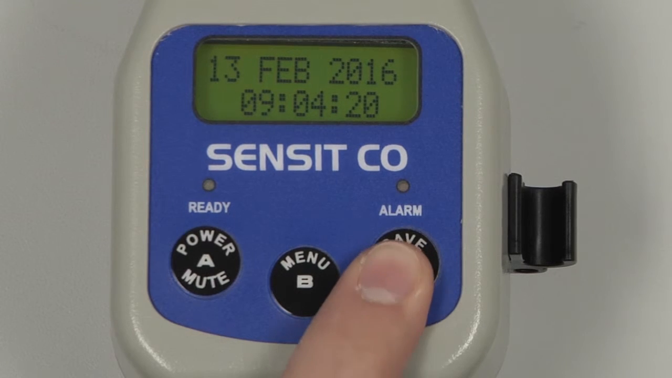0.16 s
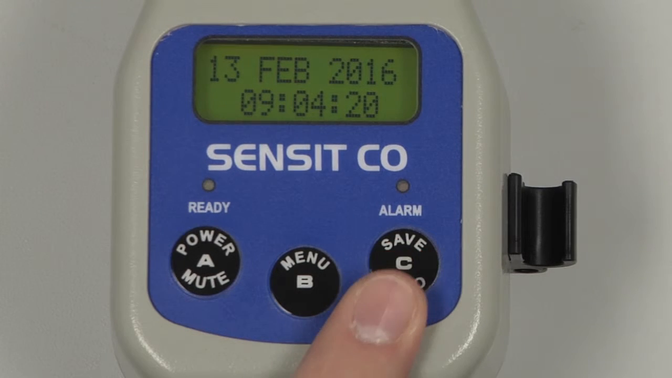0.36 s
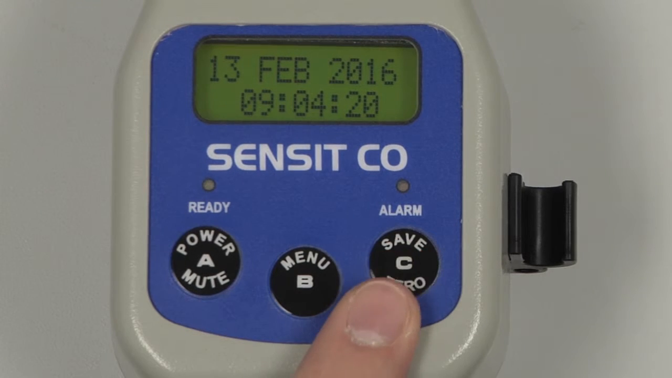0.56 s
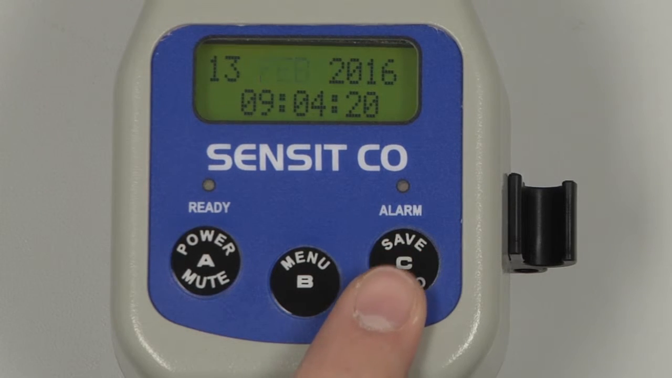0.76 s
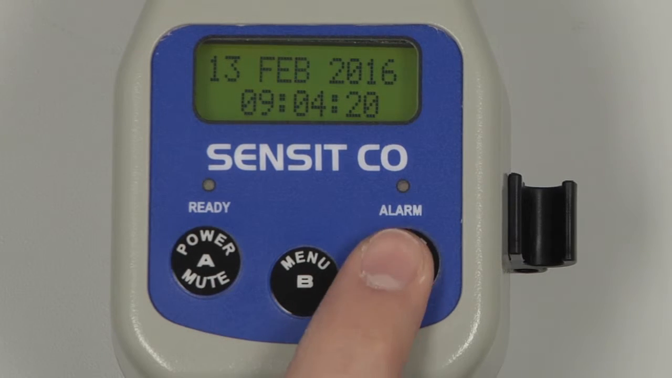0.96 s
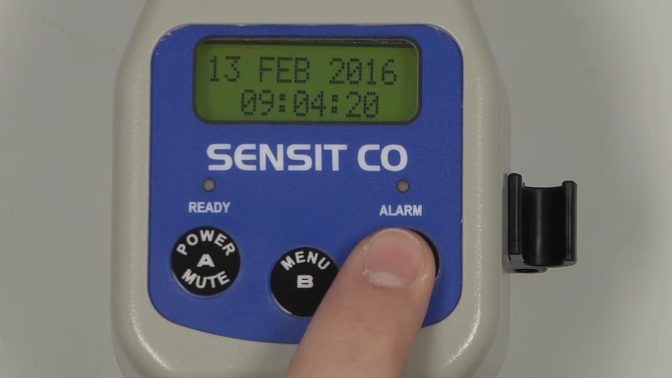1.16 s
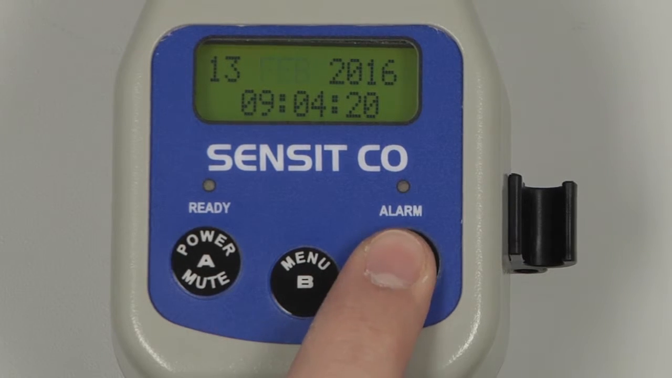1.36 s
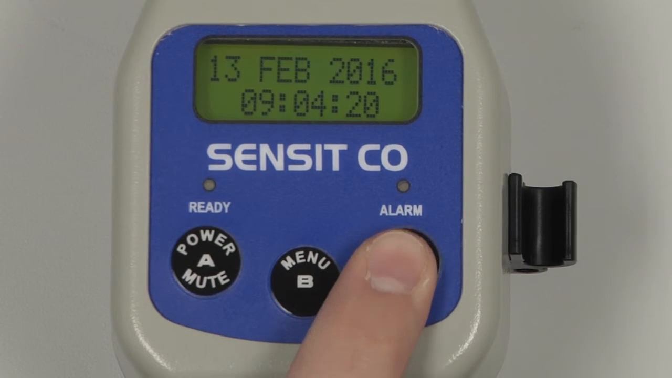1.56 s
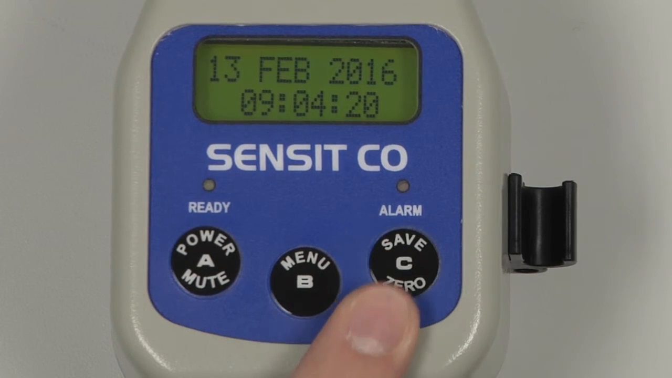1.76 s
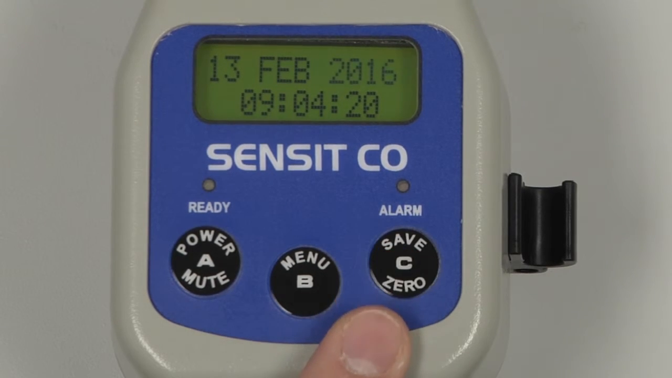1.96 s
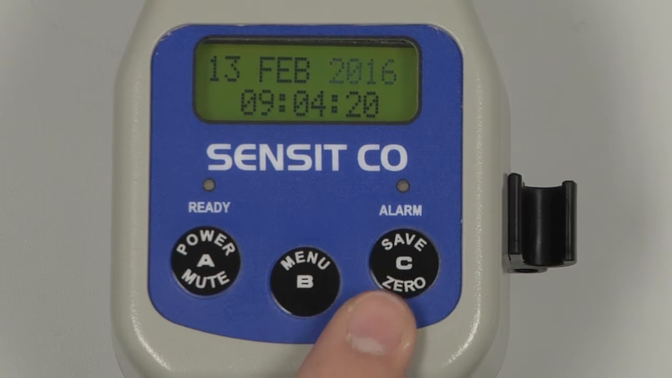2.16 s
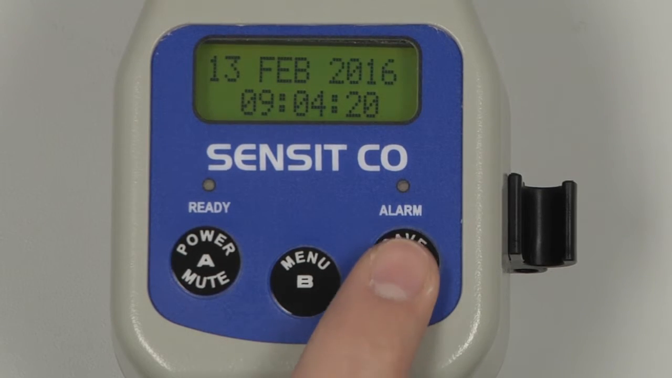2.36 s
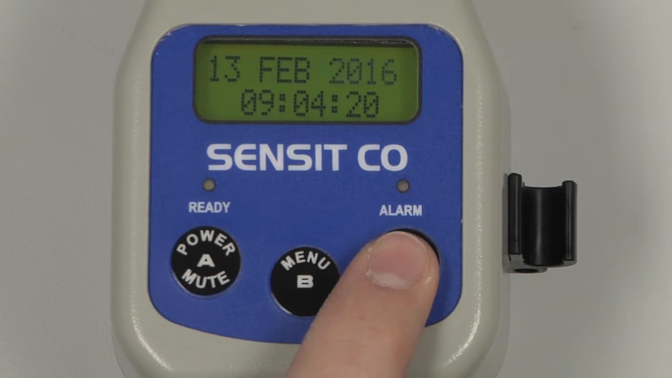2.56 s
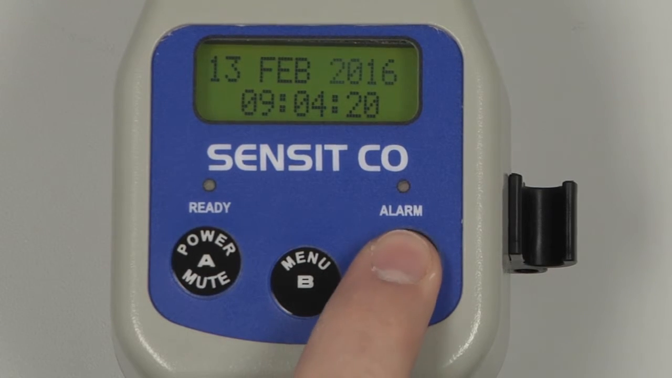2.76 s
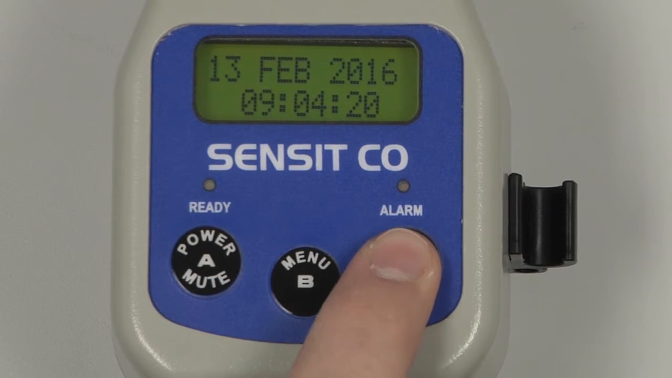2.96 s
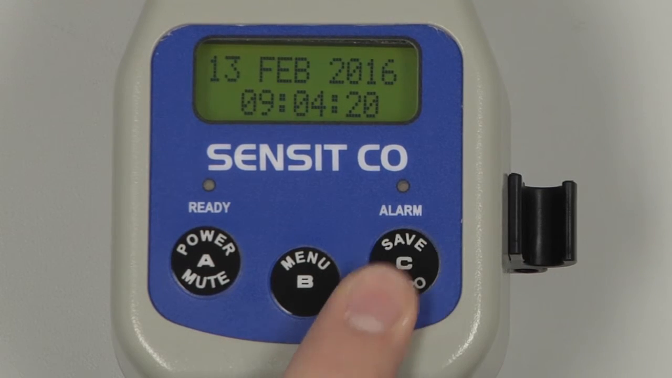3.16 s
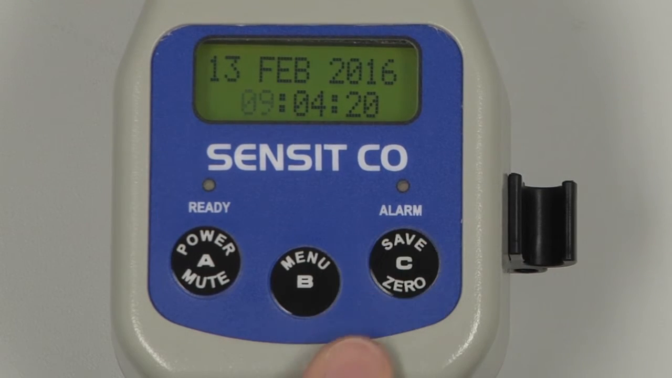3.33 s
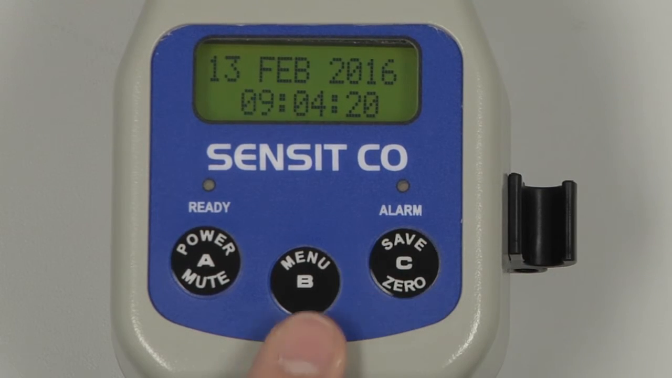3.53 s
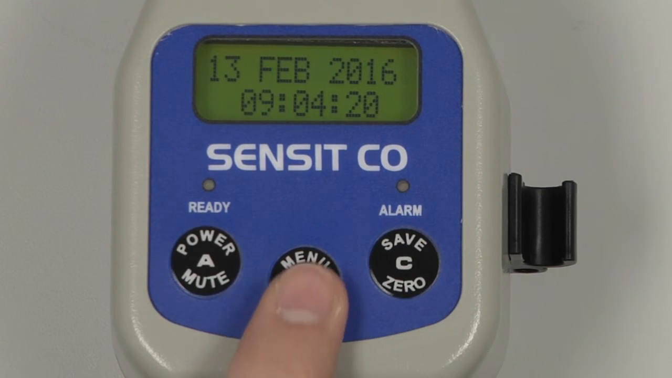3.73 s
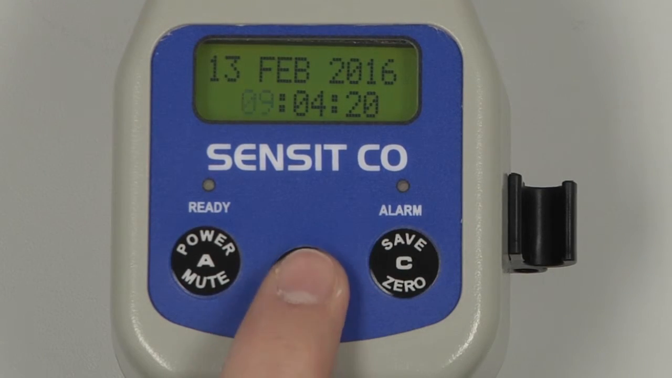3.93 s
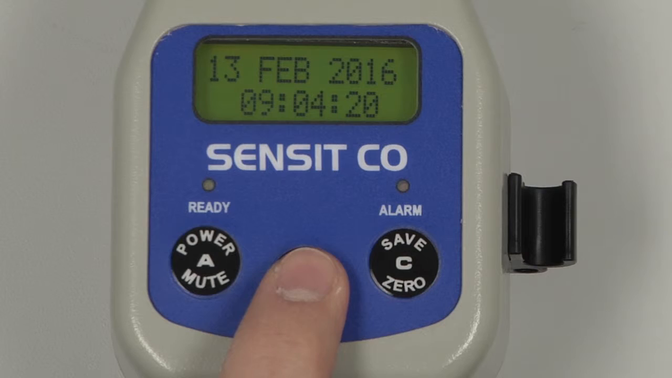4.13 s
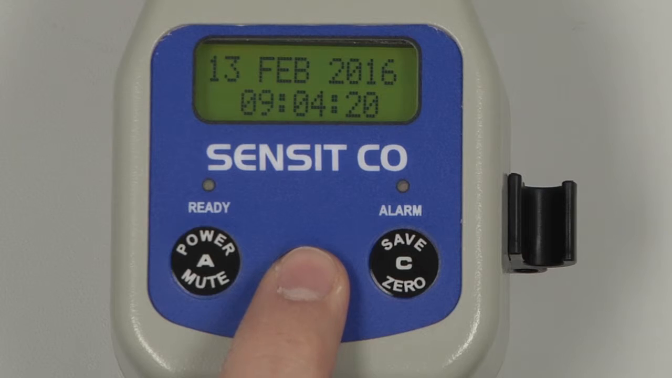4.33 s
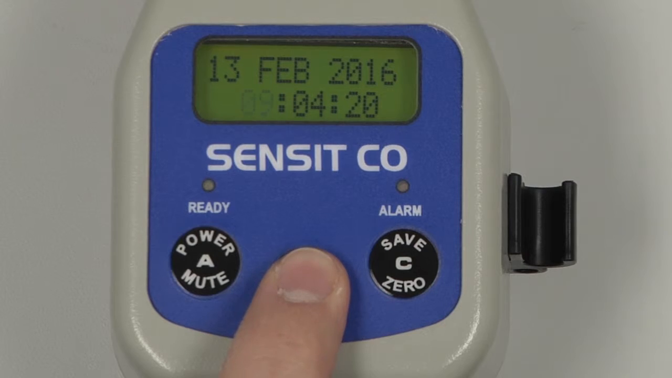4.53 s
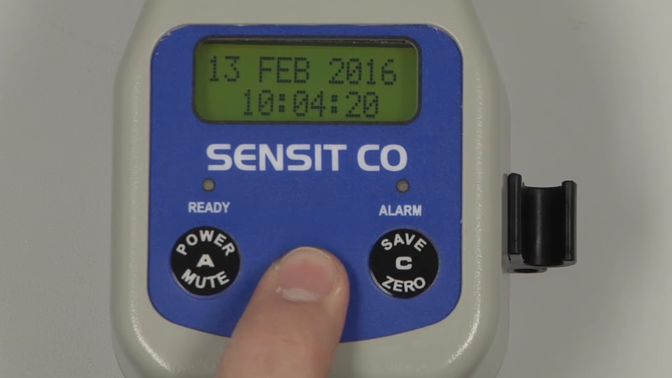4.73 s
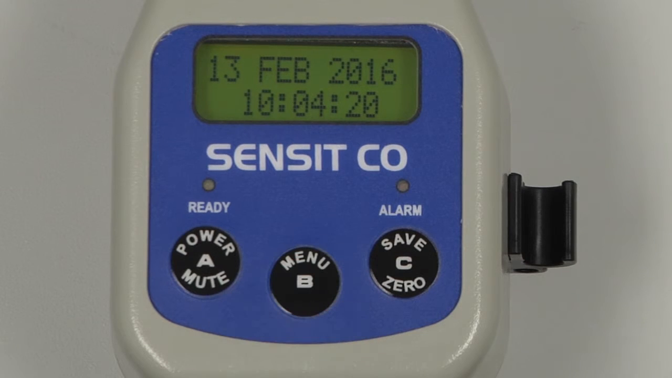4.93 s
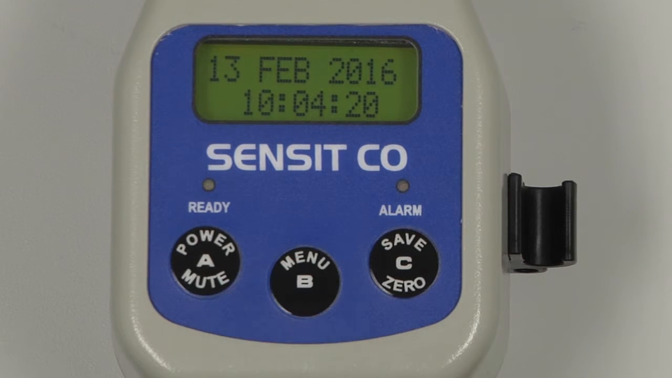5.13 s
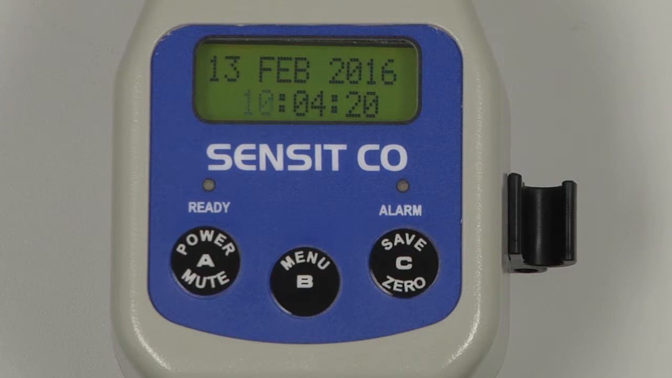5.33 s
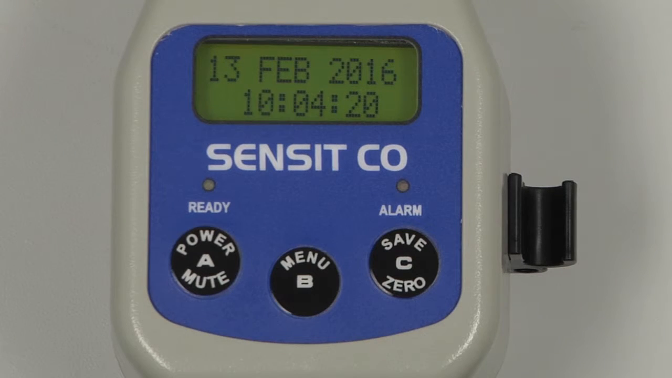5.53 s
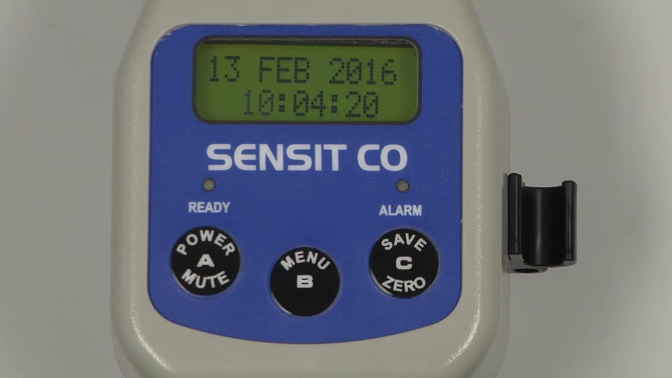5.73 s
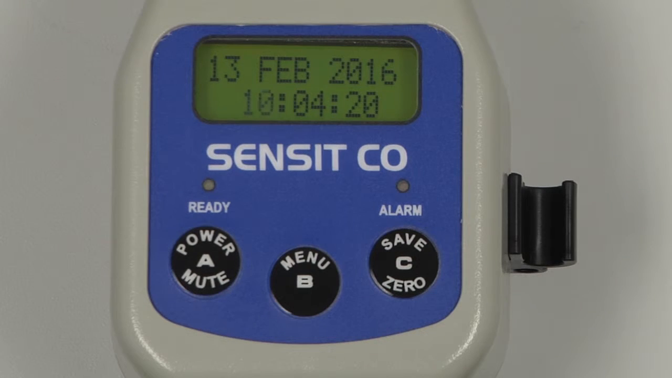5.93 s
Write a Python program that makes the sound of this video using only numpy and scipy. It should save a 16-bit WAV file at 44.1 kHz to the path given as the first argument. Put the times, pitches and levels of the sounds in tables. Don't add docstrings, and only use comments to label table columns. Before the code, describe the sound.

Close up in a quiet indoor room, a continuous harmonic motor buzz and electrical hum sit under four spaced button clicks. The first comes immediately, the others roughly a second and a half apart. Each dome snaps sharply, echoes briefly off the desk and room, then releases with a muted plastic knock. Near the end only the buzz remains, with a small creak, soft cloth rustle and a tiny hard tap.

```python
import sys
import numpy as np
from scipy import signal
from scipy.fft import rfft, irfft
from scipy.io import wavfile

SR = 44100
rng = np.random.default_rng(int(sys.argv[2]) if len(sys.argv) > 2 else 0)


def store_wav(level_fs):
    pcm = np.round(np.clip(np.atleast_2d(level_fs), -1, 1) * 32767)
    wavfile.write(sys.argv[1], SR, pcm.T.astype(np.int16))


def volts_from_decibels(level):
    exponent = np.asarray(level, float) / 20
    return 10 ** exponent


N = 268613

# (multiple of the turn rate, level [dB])
MOTOR_PARTIALS = [(1, -5), (2, -2.5), (3, -16), (4, -16.5), (5, -0.5), (6, -14), (7, -5), (8, -14),
                  (9, -12), (10, -13.5), (11, -18), (12, -0.5), (13, -13), (14, -9), (15, -17.5),
                  (16, -16.5), (17, -54), (18, -25.5), (19, -27.5), (20, -33.5), (21, -31), (22, -62),
                  (23, -21.5), (24, -26), (25, -21), (26, -26), (27, -22.5), (28, -26), (29, -25),
                  (30, -50)]
# (frequency [Hz], level [dB])
SIDE_TONES = [(430, -81), (750, -80), (860, -74), (970, -78), (1075, -84), (1500, -82), (1750, -92),
              (3200, -93)]
# (frequency [Hz], level [dB])
HOUSING_BUZZ = [(3200, -92.5), (3600, -91.5), (4200, -94.5), (4900, -92.5), (5500, -87.5), (6400, -87),
                (7200, -95), (9000, -99.5)]
# (multiple of the hum frequency, level [dB])
MAINS_PARTIALS = [(1, -61.5), (2, -90), (3, -79), (4, -71.5), (5, -81)]
# (frequency [Hz], density [dB per Hz])
RUMBLE_SPECTRUM = [(5, -12), (12, -4), (17, 12), (28, -1), (45, -13.5), (70, -15.5), (110, -25.5),
                   (200, -32), (400, -67.5)]
# (frequency [Hz], density [dB per Hz])
AIR_SPECTRUM = [(80, -17), (130, -2), (250, 2), (400, -7), (700, -7), (1000, -5), (1500, -10),
                (1900, -13.5), (2700, -16), (3500, -20), (8000, -20.5), (15600, -21), (15900, -50),
                (20000, -80)]
# (snap time [s], first contact level [dB], held [s], release level [dB], knock level [dB])
PRESSES = [(.01755, -41, .141, -43, -37), (1.44932, -38, .1382, -38, -35), (2.8944, -41, .1468, -45, -33),
           (4.6451, -38, .1431, -41, -34)]
# (frequency [Hz], level [dB], T60 [s], polarity)
CONTACT_MODES = [(2600, -7, .002, 1), (6900, 0, .0025, 1), (9500, -9, .001, 1), (14500, -7, .0007, 1)]
# (frequency [Hz], level [dB], T60 [s], polarity)
SNAP_MODES = [(209, -22, 0.05, 0.42), (314, -21.5, 0.068, 0.27), (489, -24, 0.015, -1.04),
              (810, -3.5, 0.015, -0.66), (2200, -14, 0.0018, 0.84), (2987, 0, 0.0051, 0.92),
              (3650, -12.5, 0.0086, 0.9), (5500, -12, 0.0012, 1), (6390, -8.5, 0.006, 1),
              (7500, -8.5, 0.0073, 0.54), (9500, -15.5, 0.0037, 0.72), (10900, -9, 0.0051, 1)]
# (delay [s], level [dB])
FIRST_WALLS = [(.0088, -7), (.0118, -10), (.0175, -12)]
# (frequency [Hz], T60 [s])
ROOM_T60 = [(200, 0.42), (400, 0.44), (800, 0.21), (1800, 0.23), (3200, .23), (4600, 0.22), (9000, 0.19),
            (15000, .11)]
# (frequency [Hz], level [dB])
SNAP_WALLS = [(100, -35), (200, 20.5), (400, -2.5), (600, 11), (900, 0.5), (1300, 6), (2500, 2), (4200, 2),
              (5000, 8), (6300, -1), (7500, 6.5), (8800, 6), (10000, 6), (11500, 4), (14000, -5),
              (15600, -8), (15850, -45)]
# (frequency [Hz], level [dB])
SOFT_WALLS = [(110, -16), (190, 1), (330, -1), (450, 0), (680, -4), (900, -1), (2800, -1), (9000, -10)]
# (frequency [Hz], level [dB], T60 [s], polarity)
SPRING_MODES = [(430, -1, .018, -1), (820, 4, .018, -1), (1150, 3, .014, -1), (1800, -2, .007, 1),
                (2750, -2, .009, 1), (3600, -2, .005, 1)]
# (frequency [Hz], level [dB], T60 [s], polarity)
CAP_MODES = [(195, -6, .05, 1), (290, -5, .03, 1), (430, 0, .016, 1), (700, -1, .011, 1),
             (1000, -8, .008, 1)]
# (time [s], length [s], frequency [Hz], glide [Hz per s])
SQUEAKS = [(1.01, .035, 9750, 7000), (1.035, .045, 8950, 12000), (1.095, .045, 9050, -13000),
           (1.345, .06, 9250, -1500), (1.41, .03, 9900, 6000)]
# (time [s], level [dB], frequency [Hz])
CREAKS = [(5.409, -38.5, 1220), (5.409, -46, 1750), (5.82, -50, 3000), (5.82, -54, 5000),
          (5.893, -55, 4550), (5.98, -50, 3500)]
# (frequency [Hz], density [dB per Hz])
CLOTH_SPECTRUM = [(4000, -40), (6500, -1), (8000, 0), (11000, -7), (14000, -9), (16000, -14)]
# (time [s], level [dB])
TAPS = [
    (5.7545, -26),
    (5.7604, -49),
    (5.7622, -45),
]
# (frequency [Hz], level [dB], T60 [s], polarity)
PART_MODES = [(3770, -20, .004, -1), (5800, -9, .003, -1), (7500, 0, .0038, 1), (8900, -12, .002, -1),
              (10800, -13, .002, -1), (13500, -14, .0015, 1)]


def evened(x):
    return x / np.sqrt(np.mean(x ** 2) + 1e-20)


def read(points, hz):
    f, value = np.transpose(points)
    return np.interp(np.log(hz + 1), np.log(f + 1), value)


def add(mix, s, sound):
    part = mix[round(s * SR):][:len(sound)]
    part += sound[:len(part)]


def ring(modes):
    t = np.arange(2048) / SR
    return sum(sign * volts_from_decibels(db - 60 * t / t60) * np.sin(2 * np.pi * hz * t) for hz, db, t60, sign in modes)


def drift(hz):
    f = np.fft.rfftfreq(N, 1 / SR)
    low_pass = (f > 0) / (1 + (f / hz) ** 2)
    return evened(irfft(rfft(rng.standard_normal(N)) * low_pass, N))


def coloured(spectrum):
    gain = volts_from_decibels(read(spectrum, np.fft.rfftfreq(N, 1 / SR)))
    return evened(irfft(rfft(rng.standard_normal(N)) * gain, N))


def motor():
    turn_hz, level_db = 107.628, -54
    turn = 2 * np.pi * (turn_hz * np.arange(N) / SR + 0.016 * drift(0.34))
    wobble = 2 * np.pi * np.cumsum(15 + 2.5 * drift(6)) / SR
    phase = 2 * np.pi * rng.random((80, 3))
    sway = 0.025 * drift(8)
    lines, sides = np.zeros(N), np.zeros(N)
    for k, db in MOTOR_PARTIALS:
        lines -= volts_from_decibels(level_db + db) * np.cos(k * turn + 0.5 * phase[int(k), 0]) * (1 + sway)
    for k in range(4, 30):
        below = np.cos(k * turn - wobble + phase[k, 1])
        above = np.cos(k * turn + wobble + phase[k, 2])
        sides += volts_from_decibels(read(SIDE_TONES, k * turn_hz)) * (below + above)
    loose_turn = turn + 0.01 * drift(26)
    for k in range(31, 80):
        db = read(HOUSING_BUZZ, k * turn_hz) + 9.3 * np.cos(phase[k, 1])
        lines += volts_from_decibels(db) * np.cos(k * loose_turn + phase[k, 0])
    strokes = 1 + 0.59 * np.cos(2 * turn) + 0.22 * np.cos(3 * turn)
    rattle = coloured([(2000, -150)] + HOUSING_BUZZ + [(12000, -130)]) * strokes
    tones = np.sqrt(2) * (lines + sides * (1 + 0.17 * drift(12)))
    return tones + volts_from_decibels(-69) * rattle * volts_from_decibels(0.45 * drift(11))


def mains():
    hum_hz, t = 119.95, np.arange(N) / SR
    hum = np.zeros(N)
    for k, db in MAINS_PARTIALS:
        hum += np.sqrt(2) * volts_from_decibels(db) * np.cos(2 * np.pi * (k * hum_hz * t + rng.random()))
    return hum


def air():
    swell_db = -0.85 * drift(0.5)
    rumble = coloured(RUMBLE_SPECTRUM) * volts_from_decibels(-41.5 + swell_db)
    return rumble + volts_from_decibels(-61.5) * coloured(AIR_SPECTRUM)


def presses():
    contact_lead_s, push_hz = 0.0022, 6.9
    snaps, contact, push = np.zeros(N), np.zeros(N), np.zeros(N)
    t = np.arange(4000) / SR
    scratch = rng.standard_normal((len(PRESSES), 120)) * volts_from_decibels(-60 * t[:120] / 0.010)
    snap = np.convolve(ring(SNAP_MODES), np.hanning(7) * 0.39)
    shove = np.sin(2 * np.pi * push_hz * t) * np.hanning(len(t))
    for (s, contact_db, *_), grit in zip(PRESSES, scratch):
        add(snaps, s - 0.00002, volts_from_decibels(-11.5) * snap)
        add(contact, s - contact_lead_s, volts_from_decibels(contact_db) * np.convolve(evened(grit), ring(CONTACT_MODES)))
        add(push, s, volts_from_decibels(-40) * shove)
    return snaps, contact, push


def desk_echo(x):
    late = round(0.00227 * SR)
    return np.r_[np.zeros(late), x[:-late]]


def room(x, colour):
    size, spacing = SR // 2, 10
    taps = np.zeros(size)
    at = np.arange(0, size - spacing, spacing)
    taps[at + rng.integers(0, spacing, len(at))] = rng.choice([-1., 1.], len(at))
    hz, t, bands = signal.stft(taps, SR, nperseg=512)
    decay_db = read(colour, hz)[:, None] - 60 * t / read(ROOM_T60, hz)[:, None]
    tail = signal.istft(bands * volts_from_decibels(decay_db), SR, nperseg=512)[1]
    tail *= np.clip((np.arange(len(tail)) / SR - 0.0025) / 0.007, 0, 1)
    return signal.fftconvolve(x, tail / 10)[:N]


def releases():
    knock_lag_s = 0.0061
    out = np.zeros(N)
    spring = np.convolve(ring(SPRING_MODES), np.hanning(16) / 8)
    knock = np.convolve(ring(CAP_MODES), np.hanning(30) / 15)
    for s, _, held_s, release_db, knock_db in PRESSES:
        for late, db in [(0.00016, 0.0051)] + FIRST_WALLS:
            add(out, s + held_s + late, volts_from_decibels(release_db + db) * spring)
            add(out, s + held_s + knock_lag_s + late, volts_from_decibels(knock_db + db) * knock)
    high_pass = signal.butter(2, 170, "high", fs=SR, output="sos")
    return volts_from_decibels(1.5) * signal.sosfilt(high_pass, out)


def squeaks():
    out = np.zeros(N)
    for s, length, hz, glide in SQUEAKS:
        t = np.arange(0, length, 1 / SR)
        tone = np.sin(2 * np.pi * (hz + glide * t / 2) * t)
        add(out, s, volts_from_decibels(-74) * tone * np.sqrt(np.hanning(len(t))))
    return out


def creaks():
    out = np.zeros(N)
    for s, db, hz in CREAKS:
        add(out, s, ring([(hz, db, 0.01, 1)]))
    return out


def cloth():
    out, size = np.zeros(N), round(0.17 * SR)
    add(out, 5.49, volts_from_decibels(-66) * coloured(CLOTH_SPECTRUM)[:size] * np.hanning(size))
    return out


def taps():
    out = np.zeros(N)
    for s, db in TAPS:
        add(out, s, volts_from_decibels(db) * ring(PART_MODES))
    return out


def scene():
    steady = motor() + mains() + air()
    snaps, contact, push = presses()
    echo = desk_echo(snaps)
    soft = releases()
    small = creaks() + taps()
    walls = volts_from_decibels(-6) * room(snaps + 0.26 * echo + contact, SNAP_WALLS)
    walls += room(soft + volts_from_decibels(-6) * small, SOFT_WALLS)
    near = snaps + 0.76 * echo + contact + push + soft + small
    return (steady + near + walls + squeaks() + cloth())[None]


def roll_off(x):
    return signal.sosfilt(signal.butter(12, 16830, fs=SR, output="sos"), x)


def record(dry):
    low_pass = signal.firwin(511, 16200, fs=SR)[None]
    mix = signal.oaconvolve(dry, low_pass, "same")
    return roll_off(mix)


dry = scene()
out = record(dry)
store_wav(out)
```